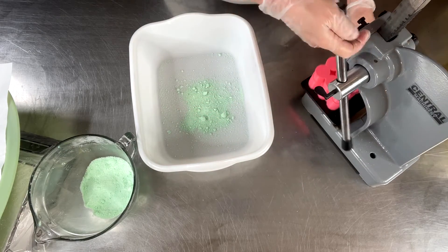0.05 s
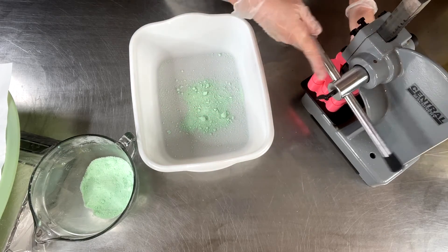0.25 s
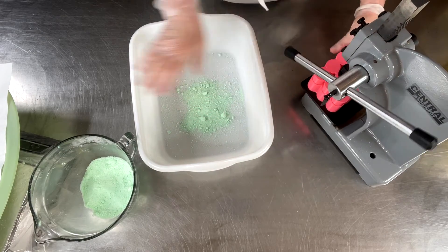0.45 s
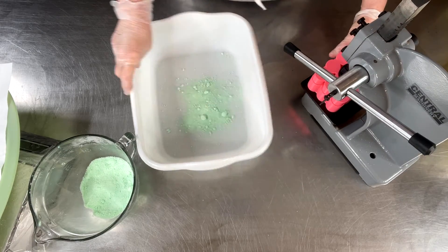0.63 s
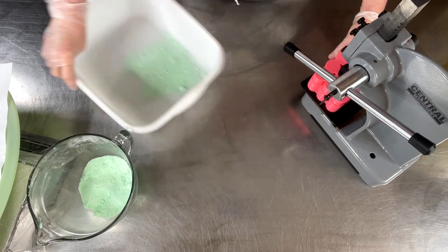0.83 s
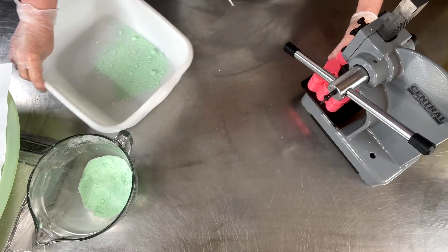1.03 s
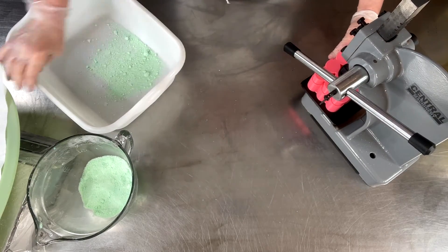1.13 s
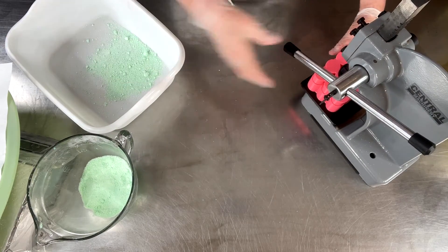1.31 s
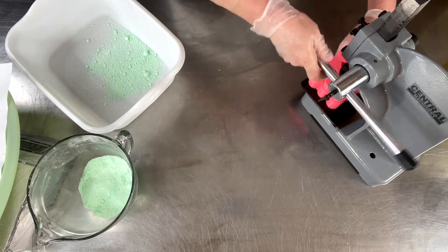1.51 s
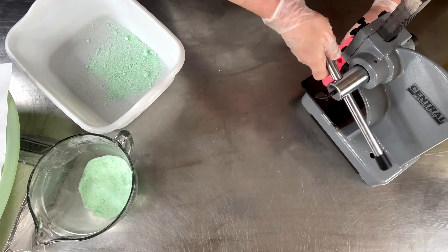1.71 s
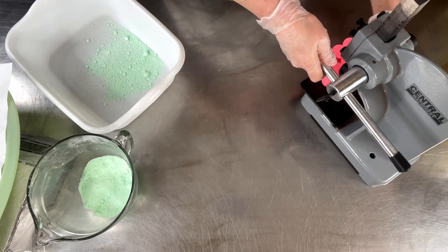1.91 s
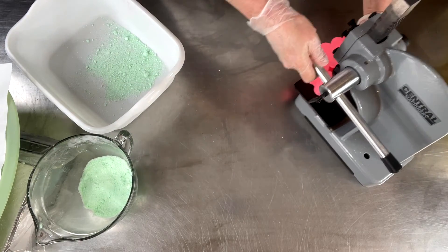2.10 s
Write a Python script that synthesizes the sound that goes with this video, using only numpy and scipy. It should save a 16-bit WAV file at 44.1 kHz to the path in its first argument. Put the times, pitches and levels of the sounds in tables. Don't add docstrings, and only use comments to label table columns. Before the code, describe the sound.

A metal press handle clanks hard at 0.2 s with a short ring and loose clatter, then knocks dully at 0.35-0.54 s. A gloved hand catches a hollow plastic tub at 0.57-0.65 s; it drums on the steel table at 0.67 s and scrapes grittily at 0.8-1.05 s, fading by 1.3 s. Handle knocks and ratchety rattle return at 1.55-1.85 s, faint touches at 2.1 s, over low room rumble.

```python
import sys
import numpy as np
from scipy import signal
from scipy.fft import rfft, irfft
from scipy.io import wavfile
from scipy.ndimage import uniform_filter1d

SR = 44100
rng = np.random.default_rng(int(sys.argv[2]) if len(sys.argv) > 2 else 0)


def to_wav(sig):
    pcm = np.clip(np.atleast_2d(sig), -1, 1) * 32767
    pcm = np.round(pcm).astype(np.int16)
    wavfile.write(sys.argv[1], SR, pcm.T)


def how_loud(loudness_db):
    steps = np.asarray(loudness_db, float) / 20
    return 10 ** steps


N = 94815


def evened(x):
    return x / np.sqrt(np.mean(x ** 2) + 1e-20)


def read(points, hz):
    table_hz, value = np.transpose(points)
    return np.interp(np.log(hz + 1), np.log(table_hz + 1), value)


def colour(x, gain):
    hz = np.fft.rfftfreq(x.shape[-1], 1 / SR)
    return irfft(rfft(x) * gain(hz), x.shape[-1])


def sloped(spectrum):
    return lambda f: how_loud(read(spectrum, f))


def resonant(peaks):
    return lambda f: sum(how_loud(db) / (1 + (2 * (f - hz) / width) ** 2) for hz, width, db in peaks)


def struck(blows, modes, contact_s, crack_db, crack_hz, split, side_db, scatter=2):
    cluster = 5
    rattle_depth = 0.65
    t = np.arange(SR // 3) / SR
    out = np.zeros(N + SR)
    hz, db, t60 = np.repeat(modes, cluster, axis=0).T
    offsets = np.resize([0.093, -1.02, 1.04, -2.08, 2.24], len(hz))
    hz = hz * (1 + split * offsets * rng.uniform(0.39, 0.79, len(hz)))
    db = db + side_db * (np.arange(len(hz)) % cluster > 0)
    decay = how_loud(-60 * t / t60[:, None])
    octaves = np.log2(hz / hz[len(hz) // 3])
    crack_band = signal.butter(3, [crack_hz / 5, crack_hz], "band", fs=SR, output="sos")
    for start, level_db, *bright in blows:
        brightness = sum(bright)
        level_chance, pitch_chance, phase_chance = rng.standard_normal((3, len(hz)))
        noise = rng.standard_normal(len(t))
        gains = how_loud(db + brightness * octaves + 3.0 * level_chance)
        phase = 2 * np.pi * (hz * (1 + 0.0008 * pitch_chance))[:, None] * t
        partials = decay * np.sin(phase + scatter * phase_chance[:, None])
        ring = (1 - np.exp(-t / contact_s)) ** 2 * (gains @ partials) / np.linalg.norm(gains)
        rattle = 1 + rattle_depth * np.minimum(t / 0.02, 1) * evened(uniform_filter1d(noise, size=150))
        force = noise * np.exp(-t / (1.2 * contact_s)) * np.minimum(t / contact_s, 1)
        crack = signal.sosfilt(crack_band, force)
        crack = how_loud(crack_db + 1.7 * brightness) * crack / np.abs(crack).max()
        out[round(start * SR):][:len(t)] += how_loud(level_db + 6.0) * (rattle * ring + crack)
    return out[:N]


def friction(strokes, gain):
    grains_per_s, grain_spread_db, clump_db = 2300, -1, 2
    t = np.arange(N) / SR
    level = sum(how_loud(np.interp(t, *np.transpose(stroke), -120, -120)) for stroke in strokes)
    grains = how_loud(grain_spread_db * np.minimum(rng.exponential(1, N), 4))
    grains = grains * (rng.random(N) < grains_per_s / SR)
    clumps = how_loud(clump_db * evened(uniform_filter1d(rng.standard_normal(N), 300)))
    clicks = clumps * (grains + 1.7) * rng.standard_normal(N)
    return level * evened(colour(clicks, gain))


def burst(start, level_db, t60):
    t = np.arange(N) / SR
    return how_loud(level_db - 60 * np.abs(t - start) / abs(t60)) * (t > start)


# frequency in Hz, density in dB per Hz.
AIR_SPECTRUM = [(15, -34.5), (25, -2), (64, -13.5), (193, -13), (246, -17.5), (389, -25), (6210, -51.5),
                (7300, -48.5), (15500, -77.5)]


def air():
    shared, own = rng.standard_normal(N), rng.standard_normal((2, N))
    tone = how_loud(-57.5) * evened(colour(shared + 0.28 * own, sloped(AIR_SPECTRUM)))
    hum = how_loud(-57.5) * np.sin(2 * np.pi * 237.3 * np.arange(N) / SR)
    rumble = how_loud(-55.5) * evened(colour(rng.standard_normal(N), resonant([(65.8, 25, 0)])))
    return tone + hum + rumble


# frequency in Hz, t60 in seconds.
ROOM_T60 = [(200, 0.72), (1000, 0.18), (3000, 0.36), (8000, 0.27), (14000, 0.29)]


def room(x):
    mono_hz = 300
    taps = np.zeros((3, SR))
    at = np.arange(240, SR - 20, 20) + rng.integers(0, 20, (3, (SR - 241) // 20))
    np.put_along_axis(taps, at, rng.choice([-1., 1.], at.shape), 1)
    apart = colour(taps[1:], lambda f: f / (f + mono_hz))
    hz, t, z = signal.stft(taps[0] + 1.52 * apart, SR, nperseg=256)
    fading = z * how_loud(-60 * t / read(ROOM_T60, hz)[:, None])
    tail = signal.istft(fading, SR, nperseg=256)[1]
    return signal.fftconvolve(x[None], tail / np.linalg.norm(tail[0]), axes=1)[:, :N]


# start in seconds, level in dB, t60 in seconds, pitch in Hz.
PIPS = [
    (.41, -56, 0.045, 2000),
    (.779, -39, 0.06, 4000),
    (0.801, -46, 0.063, 950),
    (1.439, -61, 0.055, 7450),
    (1.683, -55, 0.036, 1400),
    (1.701, -45, 0.033, 1350),
    (2.097, -51.5, 0.15, 1850),
    (2.1, -55.5, 0.052, 4460),
    (2.096, -52, .1, 545),
]


def small_parts():
    noise = rng.standard_normal(N)
    width = 0.3
    return sum(burst(*row) * evened(colour(noise, resonant([(hz, width * hz, 0)]))) for *row, hz in PIPS)


# start in seconds, level in
# dB, t60 in seconds.
TICKS = [(0.2028, -32, 0.021), (0.2074, -26, 0.0096), (.584, -47, .03), (.618, -45, .03),
         (0.66, -45, 0.024), (.714, -43.5, 0.038), (.761, -40, .015), (0.7687, -36, .03), (0.78, -43, .03),
         (0.8, -32.5, 0.081), (0.843, -30.5, 0.035), (0.926, -33.5, 0.034), (1.094, -46.5, 0.069),
         (1.146, -49, 0.056), (1.156, -48, 0.051), (1.241, -50.5, 0.062), (1.267, -53.5, 0.058),
         (2.037, -53, 0.028), (2.138, -51, .04), (2.103, -55.5, 0.048)]
# frequency in Hz, level in dB.
SNAP = [(500, -12), (1500, -5.5), (4000, 1), (9000, -7.5), (13000, -12), (15600, -15)]


def sharp_ticks():
    return sum(burst(*row) for row in TICKS) * evened(colour(rng.standard_normal(N), sloped(SNAP)))


# time in seconds, level in dB.
SCUFFS = [
    [(.405, -62), (.415, -54.5), (.5, -60.5)],
    [(.5655, -59), (.569, -32.5), (.65, -43), (.75, -52), (.762, -42), (.9, -60)],
    [(1.05, -53), (1.22, -54.5), (1.245, -50), (1.36, -65)],
    [(1.56, -67), (1.6, -84), (1.78, -62.5), (1.96, -68.5)],
]
# frequency in Hz, level in dB.
SCUFF = [(130, 3), (350, 7.5), (1000, -0.5), (2200, 2.5), (3400, -7), (5000, -30.5), (12000, -42)]


def scuffs():
    return friction(SCUFFS, sloped(SCUFF))


# time in seconds, level in dB.
GLOVE = [
    [(0, -45.5), (.05, -54), (.085, -50), (.1, -61), (.16, -55), (.2, -49)],
    [(.4, -75), (.43, -60.5), (.48, -73), (.56, -57)],
    [(1.436, -87.5), (1.441, -75), (1.47, -98.5)],
    [(1.52, -70), (1.54, -62.5), (1.62, -57), (1.7, -46.5), (1.8, -58), (1.88, -63.5), (1.92, -60),
     (1.97, -71)],
    [(1.97, -62), (2.0, -57), (2.035, -62), (2.06, -65), (2.105, -52), (2.15, -52)],
]
# frequency in Hz, level in dB.
RUB = [(400, 3), (1500, -3.5), (3500, -9), (6070, -7.5), (11500, -17), (13500, -17), (15000, -55)]


def glove():
    return friction(GLOVE, sloped(RUB))


# time in seconds, level in dB.
DRAG = [(.55, -73), (.75, -55.5), (.77, -52), (.8, -37), (.83, -33.5), (.857, -27), (.89, -40), (.94, -40),
        (.975, -40.5), (1.0, -37), (1.03, -50), (1.09, -61.5), (1.1, -43.5), (1.13, -55.5), (1.165, -48.5),
        (1.2, -56), (1.26, -63), (1.36, -101.5)]
# frequency in Hz, level in dB.
GRIT = [(200, -8), (900, -8), (1500, -8), (3500, -2), (7500, -1), (11500, -5), (13500, -7), (15000, -30.5)]


def tub_drag():
    return friction([DRAG], sloped(GRIT))


# start in seconds, level in dB, brightness in dB per octave.
THUDS = [
    (.222, -37.5, -6.5),
    (.42, -46.5, 5),
    (.6675, -27.5, 0),
    (.68, -30, -2),
    (.695, -49, 6),
    (.707, -35.5, -2.5),
    (.79, -57, -1),
    (.85, -54.5, -13),
    (1.585, -45.5, -8.5),
]
# frequency in Hz, level in dB, t60 in seconds.
DRUM = [(63.84, -18.5, 0.9), (76.9, -11, 0.27), (138, -9.5, 0.13), (184.7, -2.5, 0.18), (213, -5.5, 0.063),
        (257.3, -1, 0.051), (318, -4, 0.021)]


def table_thuds():
    return struck(THUDS, DRUM, 0.0011, crack_db=-12, crack_hz=564, split=0.048, side_db=-11.5, scatter=0.55)


# start in seconds, level in dB, brightness in dB per octave.
GRABS = [(.566, -31, 6.5), (.572, -31.5, -9), (.584, -46, 20), (.592, -29, -10), (.6165, -23.5, -4.5),
         (.6215, -28, -1), (.634, -30.5, -6), (.645, -27, -12.5), (.653, -31, -13.5), (.69, -46, -1),
         (.845, -55, 18)]
# frequency in Hz, level in dB, t60 in seconds.
RIM = [(568, 0.5, 0.055), (777, -6.5, 0.031), (986, 2.5, 0.05), (1279, -2, 0.11), (1437, 10, 0.03),
       (1620, -5, 0.044), (2030, -4.5, 0.062), (2235, -5, 0.055), (2660, -9, 0.08), (3150, -12, 0.026),
       (4071, -4.5, 0.057), (6270, -13.5, 0.0196)]


def tub_grabs():
    return struck(GRABS, RIM, 0.00057, crack_db=-25.5, crack_hz=5800, split=.03, side_db=-13)


# time in seconds, level in dB.
CLATTER = [
    (.208, -50),
    (.213, -35),
    (.245, -38.5),
    (.3, -59.5),
    (.37, -65.5),
]
# frequency in Hz, width in Hz, level in dB.
LEVER = [(495, 190, -10), (1400, 200, -11), (2000, 230, 5), (2500, 970, -1.5), (3050, 590, -2.5),
         (3600, 230, -17), (4320, 270, -14)]


def lever_clatter():
    return friction([CLATTER], resonant(LEVER))


# time in seconds, level in dB.
SLIDES = [
    [(.34, -51), (.355, -51), (.4, -57), (.42, -57), (.45, -54), (.468, -54), (.55, -53)],
    [(1.555, -55), (1.575, -35.5), (1.61, -37), (1.645, -41), (1.665, -48), (1.75, -51.5), (1.785, -44.5),
     (1.85, -58), (1.95, -77)],
]
# frequency in Hz, width in Hz, level in dB.
GUIDE = [(244, 98, -5), (330, 53, -2), (432, 42, -2.5), (601, 82, -1), (970, 140, -13.5), (1387, 110, -13),
         (1800, 200, -18.5)]


def rack_slides():
    return friction(SLIDES, resonant(GUIDE))


# start in seconds, level in dB, brightness in dB per octave.
KNOCKS = [(.002, -41.5, 13), (.121, -47.5, -1.5), (.352, -38, -4.5), (.416, -44, -8), (.464, -36.5, -3.5),
          (.48, -48.5, 0), (.538, -39.5, 2), (1.553, -55, -0.5), (1.565, -36.5, 4), (1.575, -31, 3.5),
          (1.592, -26.5, -1.5), (1.606, -37.5, 3.5), (1.622, -36, -2.5), (1.66, -37.5, 1.5),
          (1.685, -61, 6), (1.703, -48, -3), (1.72, -51, -14), (1.775, -47, 6), (1.795, -41.5, -8.5),
          (1.84, -47.5, -8), (1.89, -67, -17), (2.099, -57, -4), (2.138, -47, 8)]
# frequency in Hz, level in dB, t60 in seconds.
RACK = [(268, -6, 0.069), (329.4, -4, 0.077), (420.3, -5.5, 0.16), (548.8, -2, 0.059), (609.6, 1, 0.058),
        (979, -6.5, 0.038), (1013, -5, 0.042), (1477, -10, 0.043), (1850, -22, 0.049), (2170, -21, 0.068),
        (2550, -27.5, 0.04), (4100, -31, 0.064)]


def handle_knocks():
    return struck(KNOCKS, RACK, 0.0011, crack_db=-31.0, crack_hz=2310, split=0.042, side_db=-10)


# start in seconds, level in dB.
CLANKS = [
    (.192, -41.5),
    (.199, -42.5),
    (.2043, -20.5),
    (.2072, -16.5),
    (.2122, -44.5),
]
# frequency in Hz, level in dB, t60 in seconds.
RAM = [(422.8, -14.5, 0.12), (544.2, -6.5, 0.093), (607.4, -6, 0.12), (838, -17.5, 0.16),
       (991, -5.5, 0.043), (1403, -4, 0.034), (1950, -3, 0.015), (1984, -2.5, 0.046), (2350, -6.5, 0.04),
       (2685, -2.5, 0.02), (3237, -9, 0.03), (3580, -12.5, 0.046), (4266, -9, 0.041), (5860, -30, 0.015)]


def ram_clank():
    return struck(CLANKS, RAM, 0.00055, crack_db=-4, crack_hz=5150, split=0.033, side_db=-4)


def scene():
    hand = scuffs() + glove()
    tub = tub_drag() + sharp_ticks() + table_thuds() + tub_grabs()
    press = lever_clatter() + rack_slides() + handle_knocks() + ram_clank()
    near = small_parts() + hand + tub + press
    return near + how_loud(-7.5) * room(near) + air()


def top_cut(x):
    return signal.sosfilt(signal.butter(12, 15750, fs=SR, output="sos"), x)


# frequency in Hz, left over right in dB.
PORT_DB = [(60, -0.5), (150, -2), (380, -5.5), (950, -3), (2380, 1.5), (5980, 1), (15000, -0.5)]
# frequency in Hz, lead of the left in radians.
PORT_RAD = [(80, 0.2), (200, -0.08), (600, 1.08), (2300, 1.02), (6000, 0.79), (9400, -1.4), (12400, -2),
            (14100, -3)]


def record(dry):
    low_hz = 42.2
    side = np.array([[.5], [-.5]])

    def port(f):
        low_cut = f ** 3 / (f ** 3 + low_hz ** 3)
        return low_cut * how_loud(side * read(PORT_DB, f)) * np.exp(1j * side * read(PORT_RAD, f))

    return top_cut(colour(dry, port))


dry = scene()
out = record(dry)
to_wav(out)
```